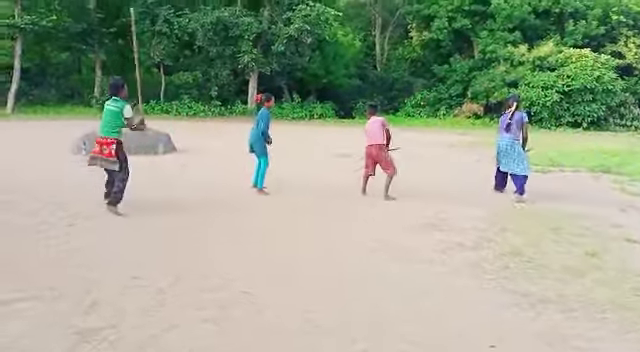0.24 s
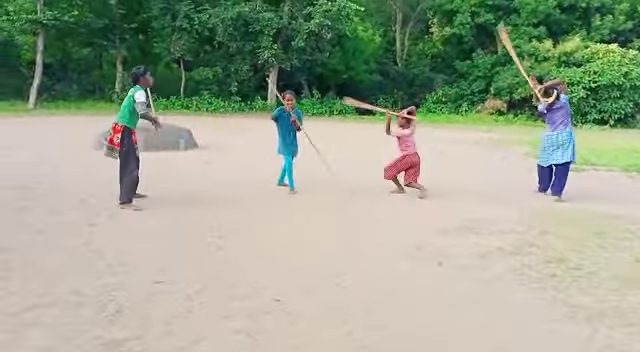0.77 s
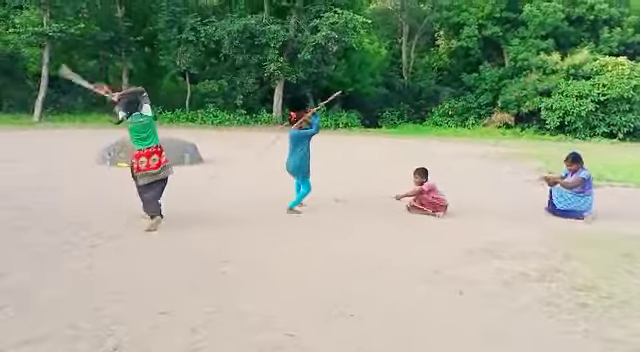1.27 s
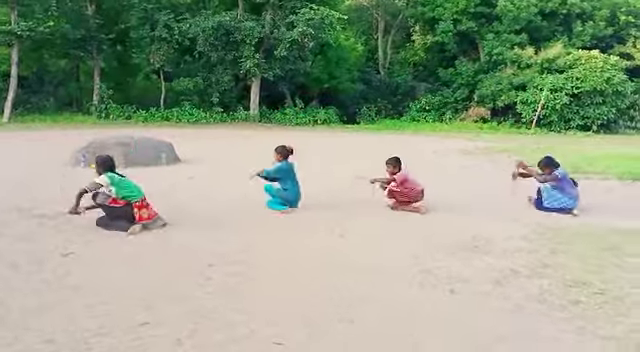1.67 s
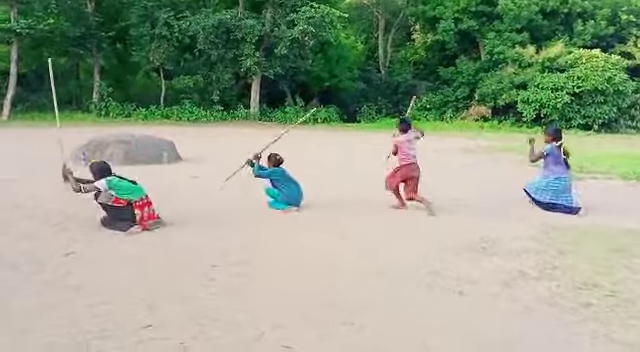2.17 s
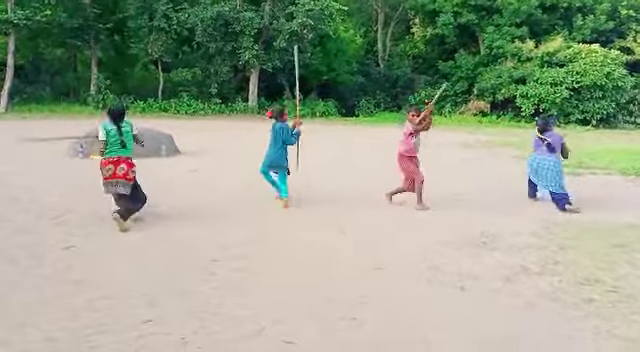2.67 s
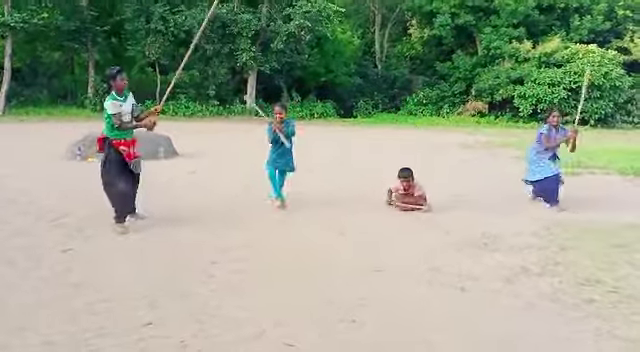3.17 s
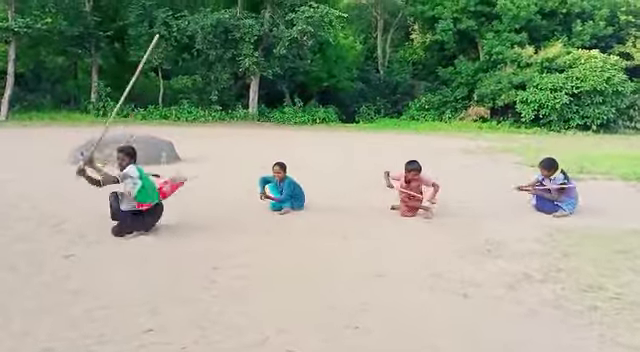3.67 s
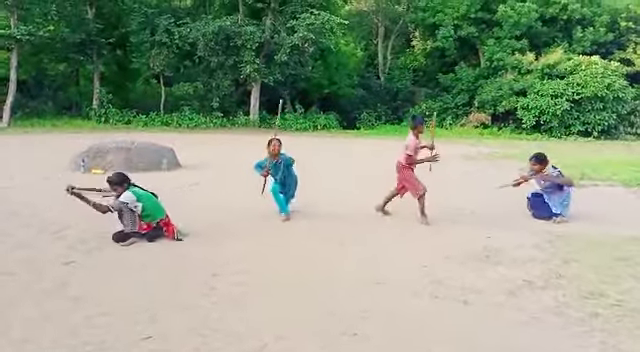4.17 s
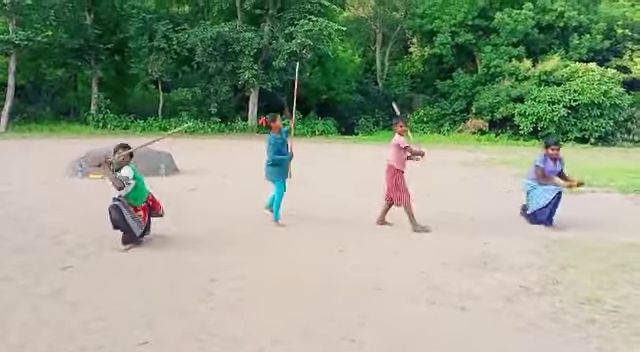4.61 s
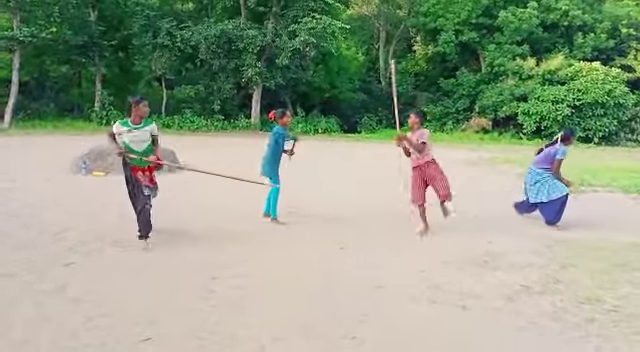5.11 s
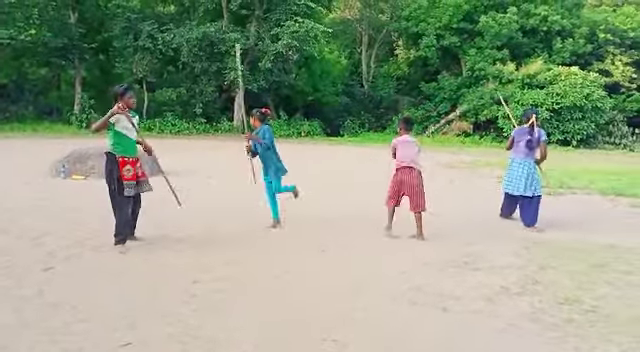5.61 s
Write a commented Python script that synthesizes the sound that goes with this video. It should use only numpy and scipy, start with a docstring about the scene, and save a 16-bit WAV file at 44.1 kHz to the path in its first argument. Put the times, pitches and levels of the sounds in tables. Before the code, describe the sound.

Outdoors on sand beside a wood, bamboo staffs swing with low airy hums and strike the ground: a fast cluster of sharp hollow clacks first, then spaced knocks with gritty crunches. Feet scuff softly. Distant peafowl wail and thin whistles sound faintly. The later part is mostly quiet, with a few weak taps. Microphone at moderate distance; a short bright tail from the trees.

```python
"""A quick run of woody clacks opens a drill: four people with long bamboo staffs on sand by a wood.
The staffs hum as they swing, then knock, ring and slap the ground: short bursts of force shake bamboo
modes; three dull footfalls are made by the same rule. Scuffs, digging tips and a swish are shaped noise.
Birds wail and whistle far off as arching, blurred tones, over a noise hush.
The wood answers with a bright tail: the sounds are convolved with decaying bands of noise."""
import sys
import numpy as np
from scipy import signal
from scipy.fft import rfft, irfft
from scipy.io import wavfile

SR = 44100
rng = np.random.default_rng(int(sys.argv[2]) if len(sys.argv) > 2 else 0)


def generate_wav(sig):
    """Save sig (samples, or channels by samples) to the path in sys.argv[1] as 16-bit PCM at SR."""
    pcm = np.round(np.clip(np.atleast_2d(sig).T, -1, 1) * 32767).astype(np.int16)
    wavfile.write(sys.argv[1], SR, pcm)


N = 257984
TIME = np.arange(N) / SR

# a staff tip digs into the sand: time [start_s], strength [level_db]
DIG_TIMES = [(0.193, -35.5), (1.173, -50.5), (1.29, -44), (1.664, -32), (2.025, -52.5), (2.99, -42.5),
             (3.447, -55), (3.8543, -44)]


def from_db(db):
    """Turn decibels into a gain."""
    return 10 ** (np.asarray(db) / 20)


def unit_energy(x):
    """Scale to a sum of squares of 1."""
    return x / np.sqrt(np.sum(x ** 2) + 1e-20)


def add(out, start_s, sound):
    """Mix a sound in, starting at the given time."""
    at = max(round(start_s * SR), 0)
    out[at:at + len(sound)] += sound[:max(N - at, 0)]


def level_curve(times_s, levels_db):
    """Draw a level in dB through the given points."""
    return np.interp(TIME, times_s, levels_db)


def noise(spectrum, size=N):
    """Filter white noise to the shape of a spectrum (Hz, dB) and scale it to rms 1."""
    hz, db = np.transpose(spectrum)
    grid_hz = np.maximum(np.fft.rfftfreq(size, 1 / SR), 1)
    gain = from_db(np.interp(np.log(grid_hz), np.log(hz), db))
    shaped = irfft(rfft(rng.standard_normal(size)) * gain, size)
    return unit_energy(shaped) * np.sqrt(size)


def keep_band(x, low_hz, high_hz):
    """Keep one band, with steep edges."""
    band = [low_hz, min(high_hz, 15000)]
    return signal.sosfilt(signal.butter(4, band, "band", fs=SR, output="sos"), x)


def stroke(peak_s, rise_s, fall_s):
    """Shape a level that swells to 1 at its peak and dies away."""
    before = np.minimum(TIME - peak_s, 0)
    after = np.maximum(TIME - peak_s, 0)
    return np.exp(-(before / rise_s) ** 2 - after / fall_s)


def hush():
    """The quiet woodland background is steady-coloured noise that slowly swells and sinks."""
    # loudness over time: [time_s], [level_db]
    hush_level = [(0, -56.5), (1.8, -59), (2.5, -63), (3.3, -58.5), (4.3, -62.5), (5.0, -59), (5.85, -62)]
    # colour of the hush: [frequency_hz], [relative level_db per Hz]
    air_spectrum = [(18, -47), (30, -47), (75, 2), (115, 4), (199, 1.5), (499, -9), (1040, -7),
                    (1500, -10.5), (2680, -9), (3980, -17.5), (6380, -37.5), (7870, -27.5), (9460, -35.5),
                    (13700, -28.5), (16000, -54)]
    return from_db(level_curve(*np.transpose(hush_level))) * noise(air_spectrum)


def wood(x, near_gain=0.72, near_s=0.013, build_s=0.056, echo_s=0.0725, echo_width_s=0.0068, echo_gain=0.88):
    """Rough ground scatters at once; trunks and leaves add a fading tail and a tree-line echo."""
    # scattered sound by pitch: [frequency_hz], [level_db], [time to fall by 60 dB, s]
    wood_bands = [(191.2, -19, 0.55), (590, -13.5, 0.38), (1213, -24.5, 1.1), (2100, -12.5, 0.49),
                  (2960, -13, 0.55), (4700, -24.5, 0.33), (8500, -7, 0.67), (13580, -49, 0.35)]
    hz, db, t60_s = np.transpose(wood_bands)
    t = TIME[:SR * 3 // 2]
    build_up = 1 - np.exp(-t / build_s) + near_gain * np.exp(-t / near_s)
    echo = 1 + echo_gain * np.exp(-((t - echo_s) / echo_width_s) ** 2)
    arrivals = build_up * echo
    edges_hz = np.geomspace(140, 16000, 15)
    response = np.zeros(len(t))
    for low, high in zip(edges_hz, edges_hz[1:]):
        log_centre = np.log(low * high) / 2
        level_db = np.interp(log_centre, np.log(hz), db)
        life_s = np.interp(log_centre, np.log(hz), t60_s)
        band_filter = signal.butter(3, [low, high], "band", fs=SR, output="sos")
        band = signal.sosfilt(band_filter, rng.standard_normal(len(t)))
        decay = np.exp(-np.log(1000) * t / life_s)
        width_gain = np.sqrt(2 * (high - low) / SR)     # a wider band carries more energy
        response += from_db(level_db) * width_gain * unit_energy(band * arrivals * decay)
    return signal.fftconvolve(x, response)[:N]


def calls(notes, clear_hz=60.0):
    """Each call is a tone that arches up and sags; many paths through the leaves blur its pitch."""
    out = np.zeros(N)
    for start_s, length_s, top_hz, sag_hz, blur_hz, level_db in notes:
        u = np.linspace(-1, 1, round(length_s * SR))    # -1 at the start, 1 at the end
        phase = 2 * np.pi * np.cumsum(top_hz - sag_hz * u ** 2) / SR
        # slow random wobbles spread the tone into a narrow band
        slow = signal.butter(2, blur_hz, fs=SR, output="sos")
        paths = signal.sosfilt(slow, rng.standard_normal((2, SR)))[:, -len(u):]
        blurred = unit_energy(paths[0] * np.cos(phase) + paths[1] * np.sin(phase)) * np.sqrt(len(u))
        clear = np.exp(-blur_hz / clear_hz)     # the less blur, the more arrives as one steady line
        tone = np.sqrt(2 * clear) * np.cos(phase) + np.sqrt(1 - clear) * blurred
        add(out, start_s, from_db(level_db) * np.sqrt(1 - u ** 2) * tone)
    return out


def small_birds(sag_per_s=0.23, blur_share=0.0016):
    """Thin whistles arch in pitch: the longer the note, the further its ends sag."""
    # whistles before the wood scatters them: [start_s], [length_s], [top pitch_hz], [level_db]
    whistle_notes = [(0.168, .56, 12670, -70), (.33, 0.26, 15450, -71), (.3, 0.35, 13900, -74),
                     (2.79, 0.28, 12800, -74), (2.87, .35, 14100, -77), (3.598, .23, 4730, -69.5),
                     (4.95, .37, 14300, -70.5), (4.96, .45, 15600, -79), (5.766, 0.35, 4870, -65)]
    # sag is a share of the pitch per second of note, blur a share of the pitch
    return calls([(s, length, hz, sag_per_s * length * hz, blur_share * hz, db)
                  for s, length, hz, db in whistle_notes])


def peafowl(sag_per_s=0.214, blur_hz=8.9):
    """One bird wails on a clear line; the flock follows, higher and blurred by distance."""
    # wails before the path to the listener: [start_s], [length_s], [top pitch_hz],
    # [level_db], [level_db of the flock]
    wail_notes = [(0.696, 0.28, 1293, -55, -57), (1.288, 0.151, 1363, -42.5, -51.5),
                  (1.921, 0.21, 1280, -53, -52), (4.827, 0.265, 1220, -55.5, -55.5),
                  (5.359, 0.26, 1344, -58.5, -55.5)]
    flock_delay_s, flock_length_s = 0.05, 0.31
    flock_hz, flock_sag_hz, flock_blur_hz = 1463, 132.6, 153.8
    leader = [(s, length, hz, sag_per_s * length * hz, blur_hz, db)
              for s, length, hz, db, _ in wail_notes]
    flock = [(s + flock_delay_s, flock_length_s, flock_hz, flock_sag_hz, flock_blur_hz, db)
             for s, _, _, _, db in wail_notes]
    return calls(leader + flock)


def scuffs(grain_db=1.5, unrest_db=3.0):
    """Sand grinds under feet and sprays from staff tips: grainy scrape and hiss; cloth swishes once."""
    # shuffling of feet and clothes: [time_s], [scrape level_db], [hiss level_db]
    shuffle_level = [(0, -54.5, -61.5), (.17, -56, -91), (.31, -56.5, -65), (0.718, -60, -71.5),
                     (1.13, -65.5, -71.5), (1.34, -53, -64.5), (1.62, -68.5, -78.5), (2.35, -65.5, -73),
                     (2.679, -70, -75), (3.05, -51.5, -67), (3.33, -70.5, -72), (3.62, -67.5, -88),
                     (4.029, -61, -66.5), (4.2, -84, -73.5), (4.551, -62, -71), (4.921, -74, -76.5),
                     (5.22, -70.5, -70.5), (5.85, -69, -77)]
    # single foot scuffs: [peak_s], [fall_s], [level_db]
    scuff_times = [(.167, 0.018, -48.5), (0.878, 0.0091, -35.5), (1.434, 0.013, -41),
                   (2.029, 0.0084, -35.5), (2.249, 0.057, -68), (2.577, 0.022, -59.5), (3.47, 0.087, -51.5),
                   (4.335, 0.034, -62.5), (4.829, 0.018, -55.5), (5.25, 0.026, -66.5), (5.6, 0.11, -63)]
    # one high swish of cloth: [time_s], [level_db]
    swish_level = [(3.17, -86), (3.215, -55), (3.245, -52.5), (3.3, -59), (3.34, -78)]
    # colours of scrape, hiss and cloth: [frequency_hz], [relative level_db per Hz]
    scrape_spectrum, sand_spectrum, cloth_spectrum = [(35, -29.5), (120, -5), (350, 2.5), (650, -1),
                                                      (1100, 2.5), (2200, 5.5), (3600, 3.5), (5500, -8.5),
                                                      (10000, -95)], [(2500, -44.5), (4200, 4),
                                                                      (5600, -4.5), (7800, 1.5), (9000, -6),
                                                                      (12000, -9), (16000, -20)], [(4000, -7), (5400, -13),
                                                                                    (6000, -1), (7000, -6),
                                                                                    (8200, -8), (9300, -15),
                                                                                    (11000, -11),
                                                                                    (13000, -18),
                                                                                    (15500, -31)]
    rise_share, feet_hiss_db = 0.76, -11    # rise against fall time; hiss against scrape
    # each dig throws up sand that lands a moment later; levels against the dig
    spray_delay_s, spray_rise_s, spray_fall_s = 0.021, 0.0056, 0.016
    spray_scrape_db, spray_hiss_db = -4, -8

    times, scrape_db, hiss_db = np.transpose(shuffle_level)
    unrest = unrest_db * noise([(1, -16.5), (5, 10), (12, 2), (60, -41.0)])     # slow level wobble in dB
    feet = sum(from_db(db) * stroke(s, rise_share * fall_s, fall_s) for s, fall_s, db in scuff_times)
    spray = sum(from_db(db) * stroke(s + spray_delay_s, spray_rise_s, spray_fall_s)
                for s, db in DIG_TIMES)
    scrape = from_db(level_curve(times, scrape_db) + unrest)
    scrape = scrape + feet + from_db(spray_scrape_db) * spray
    hiss = from_db(level_curve(times, hiss_db) + unrest)
    hiss = hiss + from_db(feet_hiss_db) * feet + from_db(spray_hiss_db) * spray
    swish_db = np.interp(TIME, *np.transpose(swish_level), left=-np.inf, right=-np.inf)
    swish = from_db(swish_db) * noise(cloth_spectrum)
    grains = from_db(grain_db * noise([(300, -3), (1500, -53)]))    # fast flicker of the level
    return grains * (scrape * noise(scrape_spectrum) + hiss * noise(sand_spectrum) + swish)


def digs(half_length_s=0.0021):
    """Sand grains burst apart for a few milliseconds under the tip."""
    # colour of the crunch: [frequency_hz], [relative level_db per Hz]
    crunch_spectrum = [(5000, -4), (7000, 1), (9500, -2), (12000, -0.5), (14000, -1), (16000, -22)]
    bursts = sum(from_db(db) * np.exp(-((TIME - s) / half_length_s) ** 2) for s, db in DIG_TIMES)
    return noise(crunch_spectrum) * bursts


def swings(turbulence_db=-4.0, glide=0.29, hum_s=0.028, rush_s=0.041):
    """Eddies shed by a swung staff hum higher as it speeds up, inside a rush of turbulence."""
    # swings: [time of top speed_s], [hum pitch_hz at top speed], [level_db]
    swing_times = [(0.049, 129.7, -44), (.574, 105.5, -51), (.632, 128, -52), (0.719, 135, -47.5),
                   (0.797, 117.2, -46), (0.901, 133, -53), (1.015, 109, -54.5), (1.12, 117.4, -53),
                   (1.331, 121.7, -47.5), (1.41, 122, -52.5), (1.655, 135, -46.5), (2.94, 140, -50)]
    # colour of the rush: [frequency_hz], [relative level_db per Hz]
    wind_spectrum = [(30, -48), (60, -29), (95, -10), (130, 0.5), (170, -12.5), (260, -20), (600, -58.5)]
    hum, rush = np.zeros(N), np.zeros(N)
    for s, hz, db in swing_times:
        speed = np.exp(-((TIME - s) / hum_s) ** 2 / 2)      # 1 at top speed
        cycles = np.cumsum(hz * (1 + glide * (speed - 1))) / SR + rng.random()
        hum += from_db(db) * speed ** 2 * np.sqrt(2) * np.sin(2 * np.pi * cycles)
        rush += from_db(db + turbulence_db) * np.exp(-((TIME - s) / rush_s) ** 2 / 2)
    return hum + rush * noise(wind_spectrum)


def resonate(force, hz, t60_s):
    """Ring one damped mode, with gain 1 at its top."""
    r = from_db(-60 / (t60_s * SR))     # what is left after each sample
    top = np.array([1, 0, -1]) * (1 - r * r) / 2
    return signal.lfilter(top, [1, -2 * r * np.cos(2 * np.pi * hz / SR), r * r], force)


def register(force, centre_hz, octaves, focus_db):
    """Where a staff is struck decides which modes ring: those round one pitch. Energy 1."""
    # ways the bamboo can ring: [pitch_hz], [relative level_db], [time to fall by 60 dB, s]
    staff_modes = [(277.7, 5, 0.0047), (386, -0.5, 0.021), (1060, 28, 0.0067), (1230, -12, 0.0092),
                   (1290, 11.5, 0.0054), (1520, -7.5, 0.0068), (1863, 6, 0.066), (2040, 3.5, 0.0109),
                   (2328, -7, 0.027), (2565, 1, 0.05), (2886, 2, 0.017), (3140, -1.5, 0.012),
                   (3300, -6, 0.029), (3647, 0.5, 0.0058), (3996, 2, 0.0075)]
    modes = np.zeros(len(force))
    for hz, db, t60_s in staff_modes:
        distance = np.log2(hz / centre_hz)      # octaves from the centre
        modes += from_db(db - focus_db * distance ** 2) * resonate(force, hz, t60_s)
    reach = 2 ** (np.clip(octaves, 0.2, 3) / 2)
    return unit_energy(keep_band(modes, centre_hz / reach, centre_hz * reach))


def contact(t, bed_s, rattle_db, chatter_db=0.5, rattle_s=0.007):
    """A hit beds down in tiny contacts round one main impact, then rattles: pressure and force."""
    swell = (t / bed_s * np.exp(1 - t / bed_s)) ** 2
    rattle = from_db(rattle_db) * np.exp(-t / rattle_s) * np.minimum(t / bed_s, 1)
    pressure = swell + rattle
    impact = np.sinc((t - bed_s) * SR)
    chatter = unit_energy(pressure * rng.standard_normal(len(t)))
    return pressure, impact + from_db(chatter_db) * chatter


def staffs_and_footfalls(thud_hz=330, thud_octaves=1.416, knock_octaves=1.12,
                         thud_focus_db=4.0, knock_focus_db=20.0, tube_focus_db=17.0):
    """Staff blows thud, knock, ring and crack, dull footfalls by the same rule: ahead and all round."""
    # staff blows, and three dull footfalls (3.627, 3.911, 4.8149 s) made by the same rule:
    # [start_s], [time to bed down_s], [knock level_db], [knock pitch_hz], [tube level_db],
    # [tube pitch_hz], [width of the tube ring_octaves], [crack level_db]
    hit_list = [(0.0525, 0.0032, -29, 1040, -21.5, 2480, 0.98, -42.5),
                (0.0607, 0.0043, -39.5, 1290, -23.5, 2640, 0.98, -49),
                (.0973, 0.0014, -26, 1180, -17, 2730, 0.9, -35),
                (0.1874, .0012, -18, 1320, -20, 2600, 1.33, -27),
                (.3889, .0012, -14.5, 1430, -22.5, 2584, 0.65, -36.5),
                (1.169, .0018, -31, 1005, -28.5, 3150, 0.59, -40),
                (1.2847, .0017, -26, 1120, -23.5, 2630, 0.71, -28.5),
                (1.6588, 0.00268, -19.5, 1500, -24.5, 2520, 1.2, -43),
                (1.7232, .0016, -33.5, 1430, -25, 2420, 0.53, -45.5),
                (2.985, .003, -31, 1080, -26.5, 2390, 1.18, -33),
                (3.0172, 0.0016, -41, 1320, -43, 2670, 0.42, -66),
                (3.4222, 0.0029, -49.5, 1080, -40, 3750, .86, -46.5),
                (3.4427, .0036, -38, 960, -34, 2490, 0.39, -44.5),
                (3.627, 0.00643, -54, 850, -59, 2620, .92, -72),
                (3.8457, 0.00243, -32, 1015, -36, 1880, 0.89, -39.5),
                (3.911, 0.0057, -61.5, 980, -71.5, 2700, .92, -77),
                (4.6357, 0.0021, -57, 1700, -45.5, 2630, 0.74, -63),
                (4.8149, 0.0037, -51, 1000, -58, 2920, .86, -65)]
    # colour of crushed grit: [frequency_hz], [relative level_db per Hz]
    crack_spectrum = [(35, -29.5), (150, -6.5), (2500, 3), (4500, 4), (5600, -4.5), (7700, -1.5),
                      (9000, -9), (12000, -17), (16000, -17.5)]
    # colour of a hit from all sides, single modes evened out: [frequency_hz], [relative level_db per Hz]
    all_round_spectrum = [(700, -27.5), (1400, -3.5), (2400, -5), (3800, -1.5), (5200, -16.5), (9000, -37)]
    all_round_tube_db, all_round_knock_db = -0.5, -6    # against the tube and the knock
    # softer landings thud and rattle more: levels at the usual bedding time, and per doubling of it
    usual_bed_s = 0.002
    thud_db, thud_db_per_doubling = -7.5, 9.5           # against the knock
    rattle_db, rattle_db_per_doubling = 2, 12           # against the first contact
    thud_fall_octaves = 0.2                             # the thud deepens per doubling too
    level_scale = np.sqrt(0.01 * SR)                    # levels are rms as if spread over 10 ms

    ahead, around, t = np.zeros(N), np.zeros(N), TIME[:SR // 8]
    for s, bed_s, knock_db, knock_hz, tube_db, tube_hz, tube_octaves, crack_db in hit_list:
        softness = np.log2(bed_s / usual_bed_s)
        pressure, force = contact(t, bed_s, rattle_db + rattle_db_per_doubling * softness)
        thud_gain = from_db(knock_db + thud_db + thud_db_per_doubling * softness)
        deep_hz = thud_hz / 2 ** (thud_fall_octaves * softness)
        thud = thud_gain * register(force, deep_hz, thud_octaves, thud_focus_db)
        knock = from_db(knock_db) * register(force, knock_hz, knock_octaves, knock_focus_db)
        tube = from_db(tube_db) * register(force, tube_hz, tube_octaves, tube_focus_db)
        crack = from_db(crack_db) * unit_energy(noise(crack_spectrum, size=len(t)) * pressure)
        add(ahead, s, (thud + knock + tube + crack) * level_scale)
        strength = np.hypot(from_db(tube_db + all_round_tube_db), from_db(knock_db + all_round_knock_db))
        spread = unit_energy(noise(all_round_spectrum, size=len(t)) * pressure)
        add(around, s, strength * spread * level_scale)
    return ahead, around


def scene(far_direct_db=-6.5, far_scatter_db=6.0, whistle_scatter_db=6.0, ahead_scatter_db=-7.0):
    """The drill is close by, the birds deep among the trees, a woodland hush under it all."""
    wails, whistles = peafowl(), small_birds()
    movement = scuffs() + digs() + swings()
    hits, all_round = staffs_and_footfalls()
    birds = from_db(far_scatter_db) * wails + from_db(whistle_scatter_db) * whistles
    scattered = wood(from_db(ahead_scatter_db) * hits + all_round + movement + birds)
    direct = hits + movement + from_db(far_direct_db) * wails + whistles
    return (direct + scattered + hush())[None]


def record(dry, cutoff_hz=15900):
    """Cut the top of the treble steeply."""
    return signal.sosfilt(signal.ellip(10, 0.1, 70, cutoff_hz, fs=SR, output="sos"), dry)


dry = scene()
out = record(dry)
generate_wav(out)
```